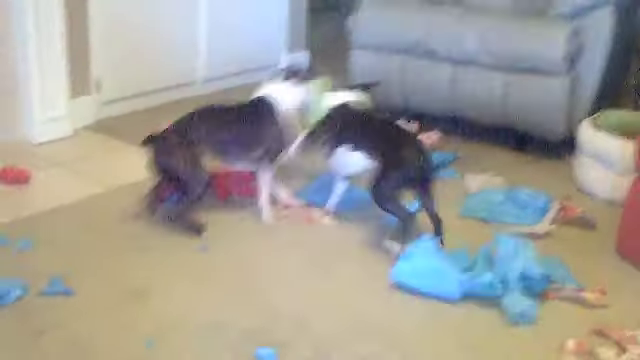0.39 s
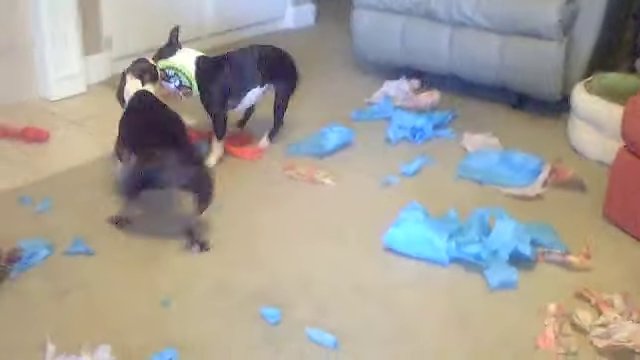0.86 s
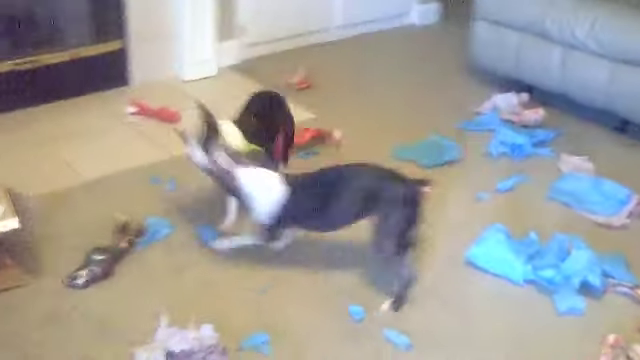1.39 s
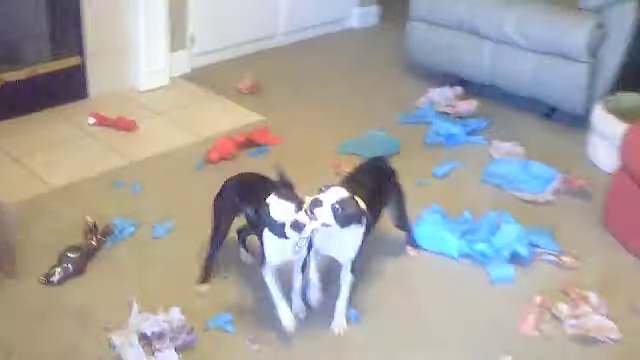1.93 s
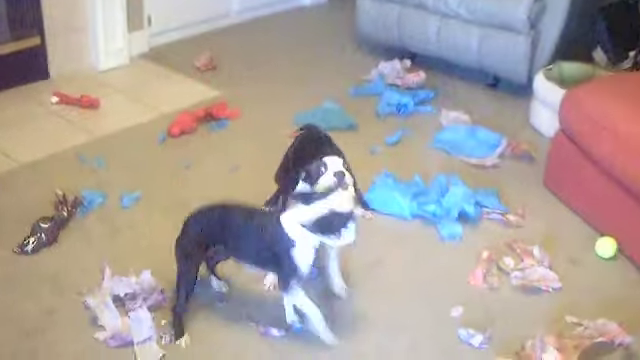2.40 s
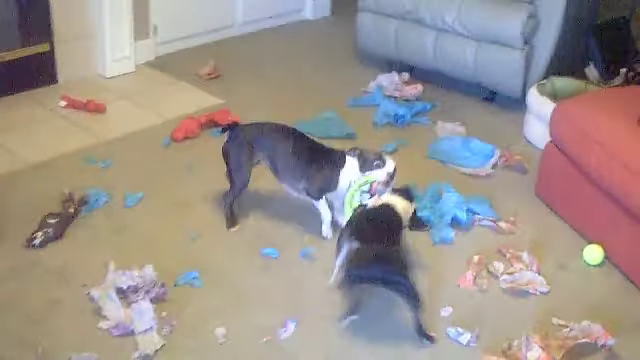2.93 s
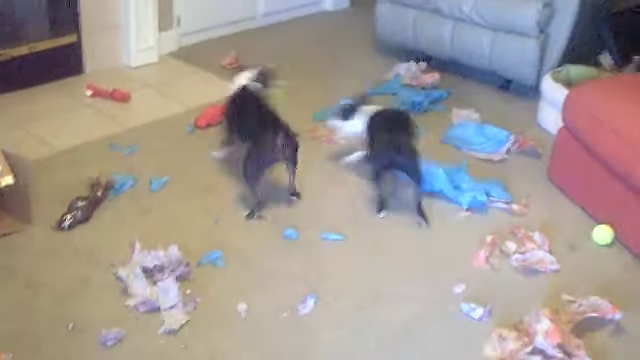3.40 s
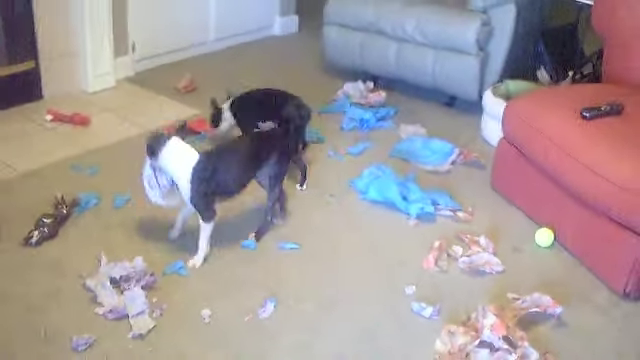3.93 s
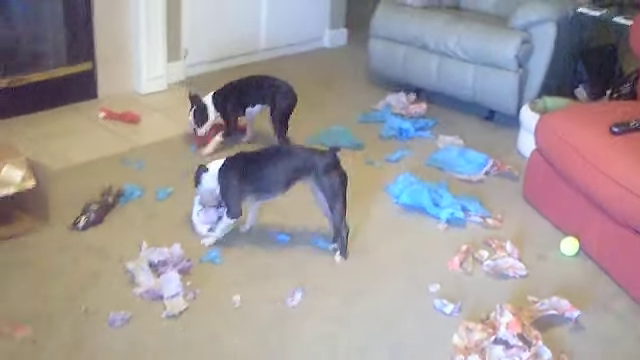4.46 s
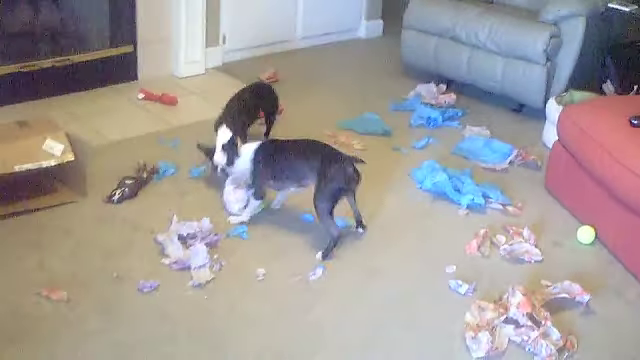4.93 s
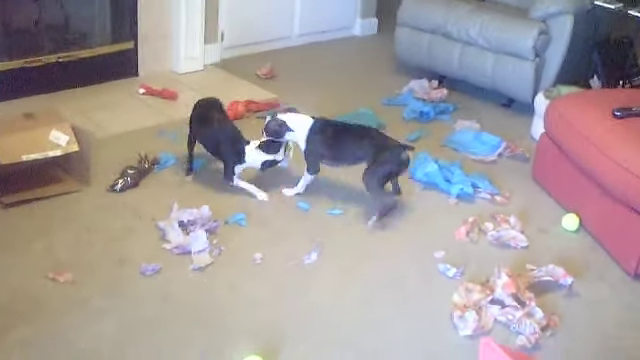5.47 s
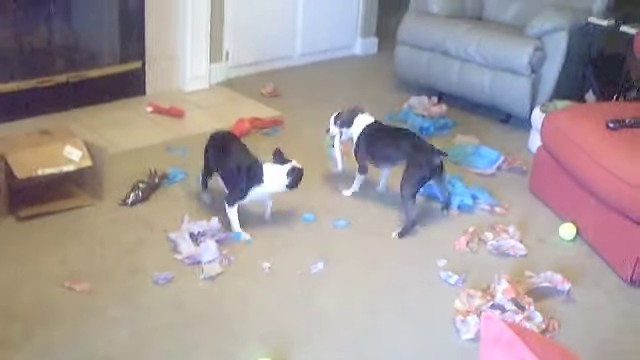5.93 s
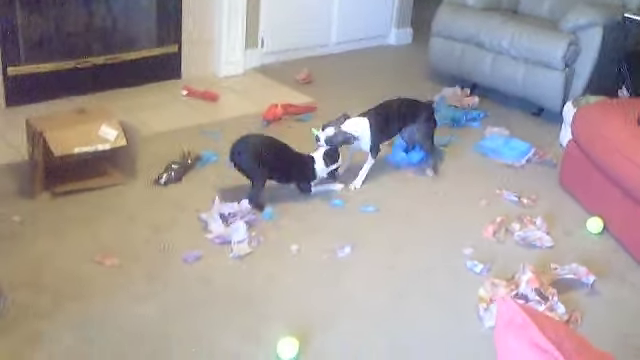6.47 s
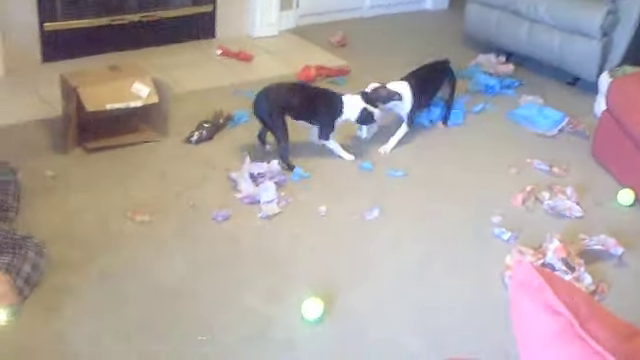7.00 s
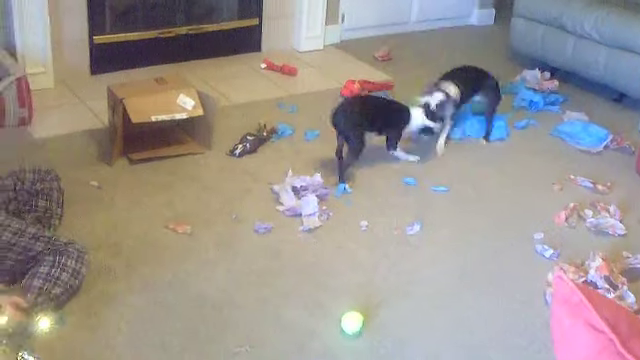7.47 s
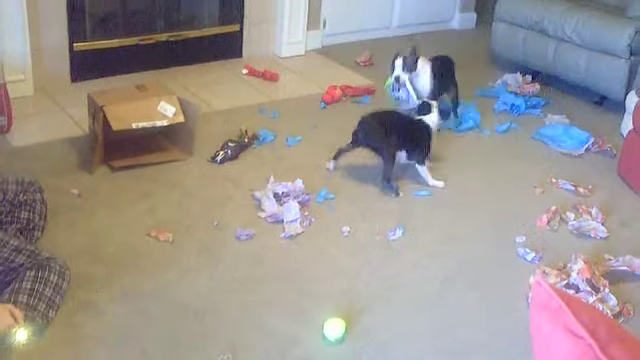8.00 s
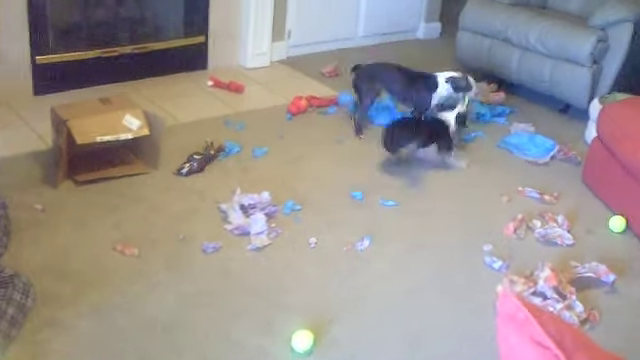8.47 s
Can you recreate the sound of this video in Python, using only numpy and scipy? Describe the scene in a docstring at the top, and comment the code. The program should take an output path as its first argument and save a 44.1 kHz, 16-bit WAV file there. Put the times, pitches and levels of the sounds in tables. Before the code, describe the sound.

Two small dogs play tug-of-war on a littered living room carpet, a few metres from the microphone. A loud rough growl opens, teeth clack, then a longer, calmer, fluttering growl follows. Short fierce bursts come next, then a near-silent pause with a faint snort, and renewed choppy snarling to the end. Paws thump softly, paper scraps rustle faintly, and the furnished room answers softly.

```python
"""Dogs growling at tug-of-war

Two small dogs tug at a toy on a carpet and growl through shut teeth: uneven throat pulses ring in the mouth,
nose and chest, and noise puffs hiss as air past the toy. Shaped noise makes the snorts, scuffs, thumps and rustling
tissue paper; decaying low tones make the paws, and a struck set of resonances one snap of teeth.
A furnished living room answers softly with decaying noise, over a quiet background.
"""
import sys
import numpy as np
from scipy import signal
from scipy.fft import rfft, irfft, next_fast_len
from scipy.io import wavfile
from scipy.ndimage import map_coordinates

SR = 44100
rng = np.random.default_rng(int(sys.argv[2]) if len(sys.argv) > 2 else 0)


def waveform_to_disk(signal):
    """Save audio, clipped to [-1, 1], as 16-bit WAV at the path in sys.argv[1]."""
    frames = np.transpose(np.atleast_2d(signal))
    scaled = np.clip(frames, -1, 1) * 32767
    samples = np.round(scaled).astype(np.int16)
    wavfile.write(sys.argv[1], SR, samples)


def invert_db(x):
    """Field ratio 10**(x/20) for x, a level in decibels (scalar or array-like)."""
    u = np.asarray(x, float) / 20
    return 10 ** u


N = 380141
TIME = np.arange(N) / SR

# The growls, one list each. Each row: time in seconds, effort in dB, central mouth resonance in Hz.
GROWL_PATHS = [
    [(0.0, -17, 1370), (0.03, -24, 1080), (0.156, -28, 1076), (0.492, -33, 1206), (0.564, -48.5, 1144),
     (0.9, -65, 1065)],
    [(1.103, -47.5, 1108), (1.151, -33, 1236), (1.599, -33.5, 1340), (1.709, -37, 1153),
     (1.899, -40.5, 1339), (2.221, -35, 1290), (2.3, -87, 1260)],
    [(2.834, -47, 1096), (2.868, -29, 1102), (3.026, -31, 1313), (3.138, -40, 1090), (3.2, -42, 1248)],
    [(3.205, -32.5, 1134), (3.263, -8.5, 891), (3.365, -21, 1340), (3.41, -24, 1138), (3.671, -29.5, 1228),
     (3.785, -31, 1224), (3.95, -82.5, 1345)],
    [(4.83, -67.5, 967), (4.912, -55.5, 990), (5.026, -45.5, 1002), (5.124, -41.5, 1404),
     (5.3, -55.5, 1270), (5.42, -83, 1072)],
    [(5.457, -34, 1217), (5.69, -24.5, 1126), (5.76, -14, 1235), (5.82, -25, 1233), (5.875, -16.5, 1177),
     (6.113, -43, 1362), (6.21, -37.5, 1040)],
    [(6.218, -32, 1420), (6.244, -27.5, 1227), (6.43, -31.5, 1340), (6.534, -22, 1366),
     (6.572, -31.5, 1300), (6.694, -27.5, 1219), (6.78, -61.5, 1290), (6.95, -57.5, 1260)],
    [(7.298, -46, 1230), (7.32, -35.5, 1257), (7.334, -25.5, 1240), (7.45, -32.5, 1328),
     (7.606, -30.5, 1365), (7.83, -31.5, 1218), (7.916, -21, 1240), (7.974, -22, 979), (8.124, -37, 1258),
     (8.24, -39, 1144)],
    [(8.245, -31.5, 952), (8.275, -18.5, 938), (8.341, -28.5, 1230), (8.49, -30.5, 1213), (8.62, -33, 1270)],
]


def unit(x):
    """Scale to rms 1."""
    return x / np.sqrt(np.mean(x ** 2) + 1e-20)


def along(points, hz):
    """Read (Hz, value) points on a log frequency axis."""
    f, v = np.transpose(points)
    return np.interp(np.log(hz + 1), np.log(f + 1), v)


def curves(rows, t=TIME):
    """Read each column after the time at times t."""
    s, *cols = np.transpose(rows)
    return [np.interp(t, s, c) for c in cols]


def gate(tables, fade):
    """Hold 1 while any of the tables lasts, with short fades outside, in seconds."""
    total = 0
    for rows in tables:
        inside = np.minimum(TIME - rows[0][0], rows[-1][0] - TIME)
        total = total + np.clip(inside / fade + 1, 0, 1)
    return total.clip(0, 1)


def wobble(rate):
    """A smooth random curve, rate knots a second."""
    return map_coordinates(rng.standard_normal(int(N * rate / SR) + 4), [TIME * rate])


def swells(events, rise, fall):
    """Gain that climbs to each (s, dB) peak and sinks after it, in dB a second."""
    s, db = np.transpose(events)[:, :, None]
    return invert_db(db + np.minimum(rise * (TIME - s), fall * (s - TIME))).sum(axis=0)


def filtered(x, response):
    """Multiply the spectrum of x by a complex response of frequency."""
    m = next_fast_len(N + 8192)
    return irfft(rfft(x, m) * response(np.fft.rfftfreq(m, 1 / SR)), m)[:N]


def noise(spectrum):
    """Coloured noise of rms 1."""
    return unit(filtered(rng.standard_normal(N), lambda hz: invert_db(along(spectrum, hz))))


def bursts(events, spectrum, rise, t60):
    """Noise of one colour, struck at each (s, dB) event and dying away."""
    age = TIME - np.array(events)[:, :1]
    level = invert_db(np.array(events)[:, 1:] - 60 * age.clip(0) / t60) * (age / rise).clip(0, 1)
    return level.sum(axis=0) * noise(spectrum)


def peak(f, hz, width):
    """One causal resonance with gain 1 at its top."""
    return 1j * f * width / (hz * hz - f * f + 1j * f * width + 1e-9)


def steady(x, modes):
    """Ring x in fixed cavities, a sum of steep resonances with alternating signs, at rms 1."""
    def response(f):
        total = 0
        for k, (hz, width, db) in enumerate(modes):
            total = total + (-1) ** k * invert_db(db) * peak(f, hz, width) * peak(f, hz, 3 * width)
        return peak(f, 2200, 18000) ** 2 * total  # thins out the extremes
    return unit(filtered(x, response))


def moving(x, rows, width):
    """Ring x in a steep resonance whose centre follows (s, Hz) rows and trembles, at rms 1."""
    f, t, z = signal.stft(x, SR, nperseg=512, noverlap=384)
    hz = curves(rows, t)[0] * (1 + .04 * np.interp(t, TIME, wobble(35)))
    z = z * peak(f[:, None], hz, width) * peak(f[:, None], .94 * hz, 4 * width) ** 2
    return unit(signal.istft(z, SR, nperseg=512, noverlap=384)[1][:N])


def quiet():
    """The still room: steady coloured noise whose level drifts slowly."""
    # Each row: frequency in Hz, relative density in dB per Hz.
    still = [(15, -25), (25, 10), (59, 3), (139, -4.5), (976, -15.5), (1580, -39), (8800, -14),
             (10500, -30.5)]
    return invert_db(-54 + 1.1 * wobble(1.5)) * noise(still)


def flap_db():
    """The soft palate flaps in the long calm growl and swings the level of the whole voice, in dB."""
    # Each row: time in seconds, flaps so far, half the swing in dB.
    flapping = [(1.24, 0, 0), (1.332, 2, 4), (1.822, 12, 6), (2.175, 19, 5), (2.2, 19, 0)]
    flaps, depth_db = curves(flapping)
    return 2 * depth_db * (np.abs(np.sin(np.pi * flaps)) - 2 / np.pi)


def folds():
    """Uneven closings of the vocal folds, and a puff of turbulence around each one."""
    # Each row: time in seconds, typical pulses a second, roughness from 0 to 1.
    pitches = [(0, 120, .55), (1.3, 162, .3), (1.45, 134, .3), (2.2, 122, .35), (2.85, 125, .45),
               (3.25, 110, .55), (3.75, 150, .4), (5.5, 100, .5), (6.3, 120, .6)]
    pitch, rough = curves(pitches)
    # cycles differ in length and in force, in clumps
    rate = pitch * np.exp(rough * (.4 * wobble(70) + .25 * wobble(14)))
    turns = np.cumsum(rate) / SR
    sizes = rng.standard_normal(int(turns[-1]) + 2)[turns.astype(int)]
    strength = invert_db(rough * (2.8 * sizes + 5.15 * wobble(25)) + flap_db())
    pulses = unit(np.diff(np.floor(turns), prepend=0) * strength)
    swirl = .7 + np.cos(np.pi * turns) ** 2
    puffs = unit(strength * swirl * rng.standard_normal(N))
    return np.sqrt(1 - rough) * pulses + np.sqrt(rough) * puffs, puffs


def head_parts(effort_db):
    """Posture, gape and effort set nose, teeth, air and chest beside the mouth, and the lips' resonance."""
    # How the head is held. Each row, one a growl: nasal, breathy and chesty level in dB.
    postures = [(-1, -6, 0.5), (1, -5.5, -2), (-1.5, -4.5, 0.5), (-1, -1, 2), (3, 2.5, 10), (-2.5, -5.5, 0),
                (-3.5, 0, -2), (-2, -1, 1), (-3, -1, 0.5)]
    # The snarl at the curled lips. Each row: time in seconds, central resonance in Hz, level in dB.
    curls = [(.07, 2377, -1.5), (.44, 2350, -3), (1.15, 2750, -4), (1.23, 2900, -1.5), (1.29, 2100, 1.5),
             (1.45, 2950, -10.5), (1.57, 2700, 5.5), (1.68, 2000, -1.5), (1.8, 2550, 3), (2, 3100, -1.5),
             (2.95, 3000, -4), (3.3, 3000, -4), (3.58, 2150, -9.5), (3.73, 2300, 0.5), (4.92, 2150, 11),
             (5.1, 2550, 3), (5.47, 2400, 1.5), (5.6, 2900, -4.5), (5.71, 3100, -9), (5.77, 2223, 1),
             (6.05, 2100, -3), (6.32, 2150, 3), (6.46, 3000, -2.5), (6.66, 2500, -2.5), (7.36, 2850, -3.5),
             (7.72, 2950, 3), (8, 2900, -3.5), (8.3, 2700, -2)]
    # The jaw opens for a moment. Each row: time of the middle in seconds, length in seconds, opening in dB.
    gapes = [(0.054, 0.088, 9.5), (3.332, 0.1, 14.5), (3.72, 0.07, 5), (4.913, 0.045, 10), (5.74, 0.14, 9),
             (5.871, 0.069, 13), (6.862, 0.05, 20.5), (7.876, 0.054, 5.5), (8.005, 0.075, 10)]
    # Nose, teeth, air, chest: level beside the mouth at a usual effort in dB.
    parts_db = [-7.5, -10, -15, -11]
    # Nose, teeth, air, chest: share of a change in effort that each follows.
    follow = [0.48, 0.77, 0.63, 0.52]
    usual_db, faint_db = -31, -57  # usual effort; weakest effort that still counts
    starts = [rows[0][0] for rows in GROWL_PATHS]
    which = (np.searchsorted(starts, TIME, side="right") - 1).clip(0)
    nasal, breathy, chesty = np.transpose(postures)[:, which]
    lips_hz, bared = curves(curls)
    s, length, db = np.transpose(gapes)[:, :, None]
    gape = (db * np.exp(-(2 * (TIME - s) / length) ** 2)).sum(axis=0)
    lag = (1 - np.c_[follow]) * (usual_db - effort_db.clip(faint_db))
    pose = [nasal + 0.61 * gape, bared + 0.9 * gape, breathy + .5 * gape, chesty]
    return np.c_[parts_db] + lag + pose, lips_hz


def bared_teeth(voice, puffs, lips_hz):
    """The snarl rings in a moving resonance at the lips between two broad, flickering ones."""
    # Frequencies of the two broad resonances in Hz.
    cheeks_hz = (1950, 2950)
    snarl = voice + 1.6 * puffs * rng.choice([-1, 1], N)  # random signs give fresh noise with the same puffs of level
    lips_path = np.c_[TIME, lips_hz * (1 + .04 * wobble(13))]
    total = moving(snarl, lips_path, width=210) * invert_db(4 * wobble(22))
    for hz in cheeks_hz:
        total = total + invert_db(-2 + 3 * wobble(15)) * moving(snarl, [(0, hz)], width=hz / 5)
    return unit(total)


def hiss(puffs):
    """Air past the toy: fresh noise with the same puffs of level hisses in high wandering resonances."""
    # Each row: frequency in Hz, width in Hz, relative level in dB.
    air_modes = [(3630, 680, -8.5), (5340, 1860, 6), (8585, 910, 5.5)]
    total = 0
    for hz, width, db in air_modes:
        path = np.c_[TIME, hz * (1 + .04 * wobble(6))]
        ring = moving(puffs * rng.choice([-1, 1], N), path, width)
        total = total + invert_db(db + 1.4 * wobble(6)) * ring
    return unit(total)


def growls():
    """The folds sound through a mouth that shifts as the jaw works on the toy, and through the head."""
    # Each row of both: frequency in Hz, width in Hz, relative level in dB.
    nose_modes = [(600, 214, 9.5), (826, 255, 4)]
    chest_modes = [(149, 53, 1.5), (218.7, 35, 4), (296.5, 115, -4.5), (470, 450, -14.5)]
    effort_db, mouth_hz = curves(np.concatenate(GROWL_PATHS))
    (nose_db, teeth_db, air_db, chest_db), lips_hz = head_parts(effort_db)
    voice, puffs = folds()
    mouth = moving(voice, np.c_[TIME, mouth_hz], width=100)
    head = invert_db(nose_db + 1.5 * wobble(18)) * steady(voice, nose_modes)
    teeth_gain = invert_db(teeth_db + 1.4 * wobble(24) + 0.53 * flap_db())
    head += teeth_gain * bared_teeth(voice, puffs, lips_hz)
    head += invert_db(air_db) * hiss(puffs)
    head += invert_db(chest_db + 1.3 * wobble(10)) * steady(voice, chest_modes)
    # as a growl after the first starts, the mouth rings hard while the rest of the head lags
    age = TIME - np.c_[[rows[0][0] for rows in GROWL_PATHS[1:]]]
    catch = np.where(age > -.01, np.exp(-age.clip(0) / 0.007), 0).max(axis=0)
    balance = invert_db(7.5 * catch) * mouth + invert_db(-3.5 * catch) * head
    return invert_db(effort_db) * gate(GROWL_PATHS, fade=0.0021) * balance


def patter():
    """Lighter steps blur into a low, unsteady rumble of the floor while the growls last."""
    # Each row: frequency in Hz, relative density in dB per Hz.
    boards = [(20, -4.5), (45, 12.5), (70, -4), (130, -7.5), (600, -42.5)]
    return invert_db(-55 + 3.6 * wobble(11)) * gate(GROWL_PATHS, fade=0.059) * noise(boards)


def scuffs():
    """Moving feet scuff paper and carpet: clumps of tiny crackles over a soft brushing."""
    # Each row: time of the peak in seconds, level there in dB.
    scuff_peaks = [(.5, -41.5), (2.5, -58.5), (3.95, -56.5), (6.8, -45)]
    # Each row: frequency in Hz, relative density in dB per Hz.
    paper = [(300, 9), (2700, 2), (4500, -5.5), (10500, -10)]
    crackles = (rng.random(N) < 900 / SR * invert_db(5 * wobble(12))) * rng.standard_normal(N)
    brushing = unit(unit(crackles) * 0.29 + rng.standard_normal(N))
    level = invert_db(0.56 * wobble(15)) * swells(scuff_peaks, rise=14, fall=32.5)
    return level * unit(filtered(brushing, lambda hz: invert_db(along(paper, hz))))


def snap():
    """Teeth clack together: one very short hard contact and a weaker chatter ring the enamel."""
    # Each row: time in seconds, approximate peak in dB.
    clacks = [(.3492, -2)]
    # Each row: frequency in Hz, width in Hz, relative level in dB.
    enamel = [(3040, 160, 2), (5580, 420, 5), (6900, 500, 3.5), (8700, 410, -1.5)]
    blow, t = np.zeros(N + SR), np.arange(SR // 50) / SR
    for s, db in clacks:
        chatter = invert_db(-20 - 60 * t / 0.0088) * rng.standard_normal(len(t))
        blow[round(s * SR):][:len(t)] += invert_db(db) * ((t == 0) + chatter)

    def response(f):
        return sum((-1) ** k * invert_db(db) * peak(f, hz, width) for k, (hz, width, db) in enumerate(enamel))
    ring = filtered(blow[:N], response)
    return ring * blow.max() / np.abs(ring).max()


def bumps():
    """Bodies and legs bump against the carpet: dull bursts of low noise."""
    # Each row: time in seconds, level in dB before rise and decay.
    bump_hits = [(.429, -35.5), (.762, -35), (2.529, -43.5), (6.846, -45.5)]
    # Each row: frequency in Hz, relative density in dB per Hz.
    bump_colour = [(50, -4), (100, -1.5), (250, -3.5), (1500, -32.5)]
    return bursts(bump_hits, bump_colour, rise=0.018, t60=0.45)


def paws():
    """Soft landings set the floor under the carpet booming: low sines that rise softly and decay."""
    # Each row: time in seconds, level in dB before rise and decay.
    landings = [(0.789, -32), (2.808, -32.5), (2.953, -31), (3.429, -31), (8.072, -35), (8.316, -26),
                (8.444, -33)]
    booms, t = np.zeros(N + SR), np.arange(SR // 4) / SR
    for s, db in landings:
        hz = 46 * np.exp(rng.normal(0, 0.06))
        shape = invert_db(db - 60 * t / .3) * (1 - np.exp(-t / .015))
        booms[round(s * SR):][:len(t)] += shape * np.sin(2 * np.pi * hz * t)
    return booms[:N]


def hum():
    """The chest carries the lowest tone of two growls, in their calmer stretches: a sine with a trembling pitch."""
    # One list a growl. Each row: time in seconds, central frequency in Hz, typical level in dB.
    hums = [
        [(1.13, 157, -50), (1.41, 146.9, -48), (1.63, 132, -49), (2.07, 137, -44), (2.2, 136.6, -58)],
        [(3.66, 164, -74), (3.734, 143, -37), (3.9, 153, -71)],
    ]
    hz, db = curves(np.concatenate(hums))
    phase = 2 * np.pi * np.cumsum(hz * (1 + 0.017 * wobble(33))) / SR
    level = invert_db(db + wobble(9.04) + 1.5 * flap_db())
    return level * gate(hums, fade=0.041) * np.sqrt(2) * np.sin(phase)


def snorts():
    """Air blown out through a short nose: noise that swells and sinks fast."""
    # Each row: time of the peak in seconds, level there in dB.
    snort_peaks = [(2.172, -28.5), (3.85, -38.5), (4.618, -38)]
    # Each row: frequency in Hz, relative density in dB per Hz.
    snort_colour = [(88, -57), (150, -3), (800, -6.5), (2700, -2.5), (4300, -10.5), (10500, -14.5)]
    return invert_db(0.51 * wobble(96)) * swells(snort_peaks, rise=245, fall=350) * noise(snort_colour)


def crinkles():
    """Scraps of tissue paper rustle: bright bursts of noise with a sharp start."""
    # Each row: time in seconds, level in dB before rise and decay.
    rustles = [(2.596, -52), (2.6384, -48), (2.7496, -47.5), (4.375, -64.5), (4.4214, -65.5)]
    # Each row: frequency in Hz, relative density in dB per Hz.
    tissue = [(1500, -1), (2800, 4.5), (5000, -13), (8400, -3.5), (10500, -13.5)]
    return bursts(rustles, tissue, rise=0.0019, t60=0.33)


def room(x):
    """Walls and furniture answer after 250 samples; each frequency dies at its own speed."""
    # Each row: frequency in Hz, time to fall by 60 dB in seconds.
    decay = [(150, 0.41), (1200, 0.4), (9000, 0.48)]
    hz, t, z = signal.stft(rng.standard_normal(SR // 2), SR, nperseg=256)
    tail = signal.istft(z * invert_db(-60 * t / along(decay, hz)[:, None]), SR, nperseg=256)[1]
    return signal.fftconvolve(np.pad(x, (250, 0)), tail / np.linalg.norm(tail))[:N]


def scene():
    """Dogs a few metres off, in a quiet room; two soft wall answers blend in a slowly wandering mix."""
    dogs, teeth = growls() + hum() + snorts(), snap()
    far = invert_db(-0.5) * dogs + invert_db(-23.5) * teeth  # what reaches the walls
    blend = 1.81 * wobble(4)  # angle that mixes the two answers
    walls = room(far * np.cos(blend)) + room(far * np.sin(blend))
    floor = paws() + patter() + scuffs() + bumps() + crinkles()
    return (dogs + teeth + walls + floor + quiet())[None]


def roll_off(x):
    """The treble ends steeply here."""
    return signal.sosfilt(signal.butter(12, 10670, fs=SR, output="sos"), x)


def record(dry):
    """Pass the finished mix through the last stage, with no other change."""
    return roll_off(dry)


dry = scene()
out = record(dry)
waveform_to_disk(out)
```